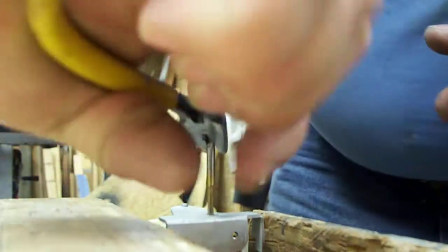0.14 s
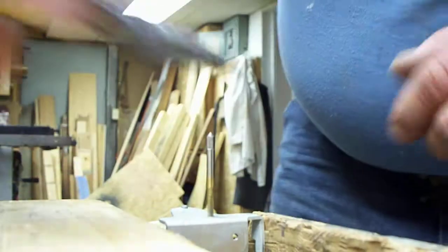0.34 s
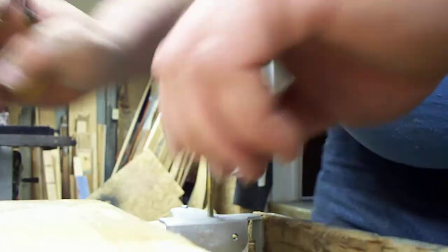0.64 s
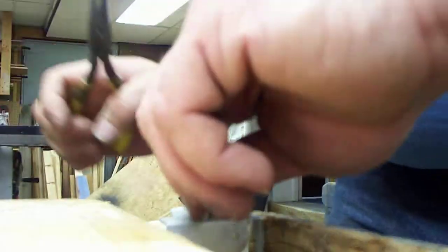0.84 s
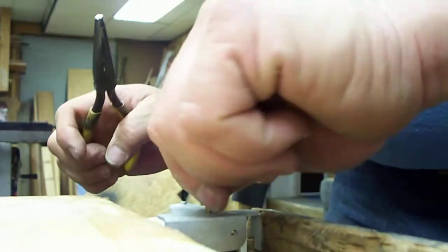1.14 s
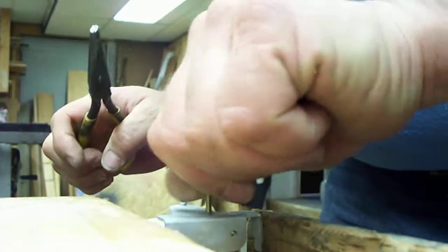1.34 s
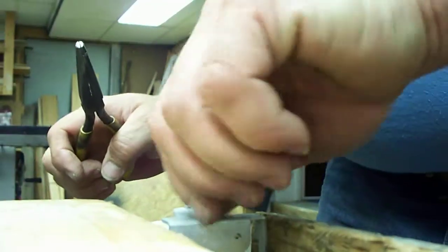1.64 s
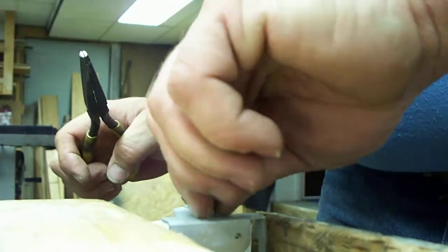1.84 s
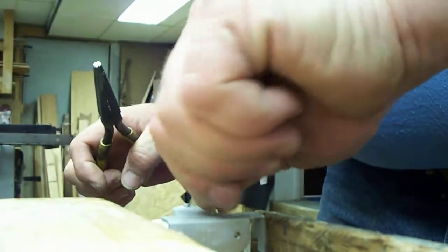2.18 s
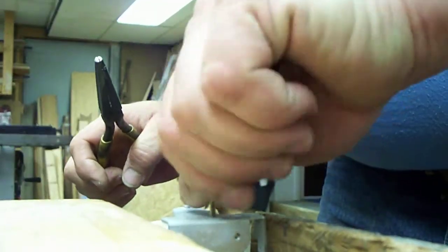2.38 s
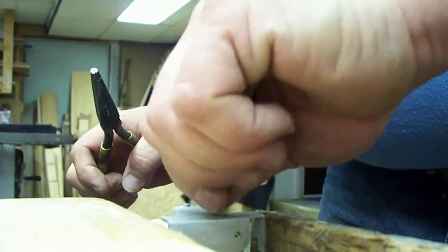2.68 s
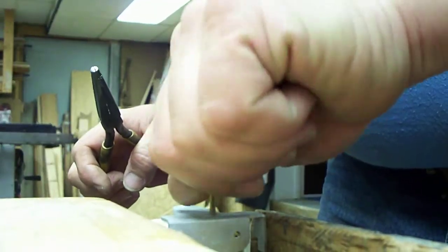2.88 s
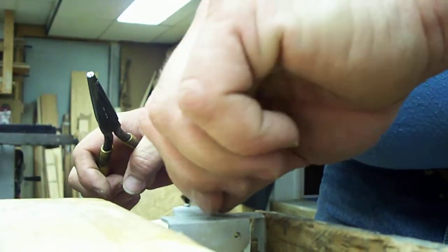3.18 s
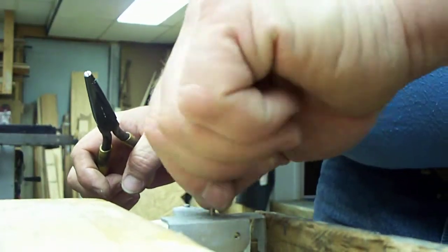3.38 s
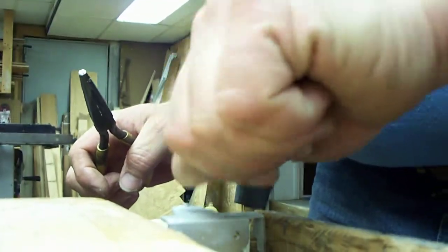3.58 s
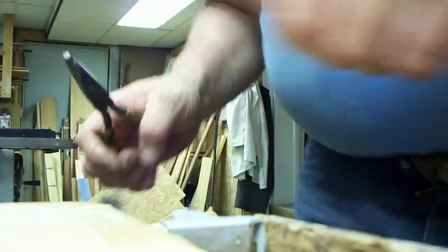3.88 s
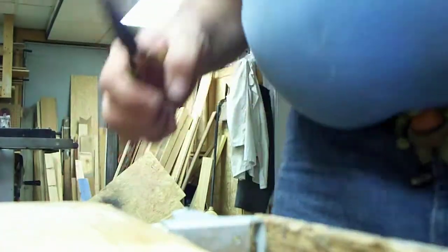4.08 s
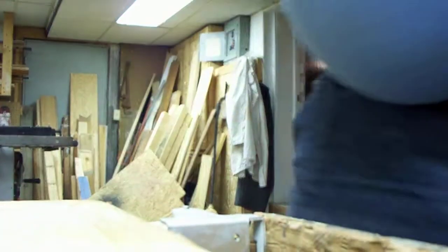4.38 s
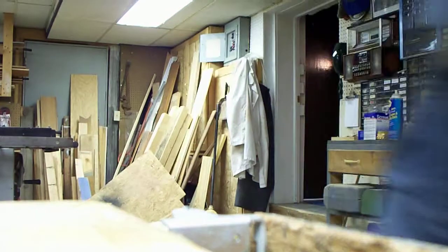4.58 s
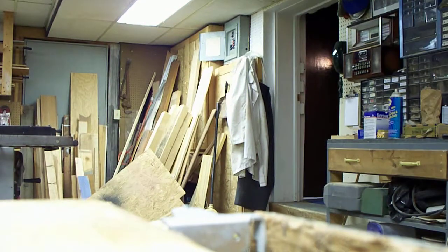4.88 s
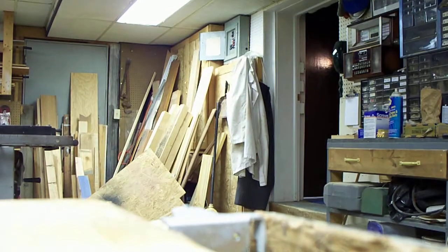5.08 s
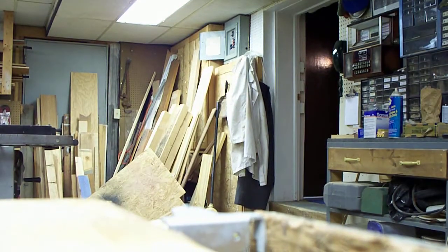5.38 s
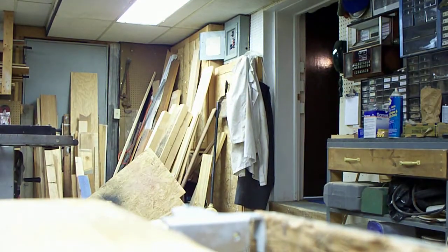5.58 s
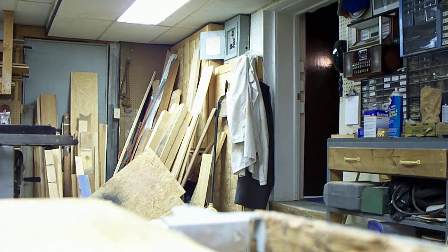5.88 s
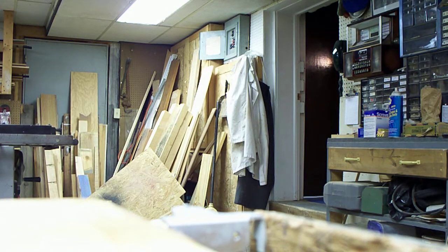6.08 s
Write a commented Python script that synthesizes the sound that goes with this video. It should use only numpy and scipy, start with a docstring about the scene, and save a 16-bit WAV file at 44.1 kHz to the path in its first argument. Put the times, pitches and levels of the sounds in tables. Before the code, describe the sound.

Small steel clacks, gritty scrapes and rustling cloth over low rush and sputtering electrical pops, ending with a loud drop of pliers on wood.

```python
"""Over a low rush, drones, a thin whine and sputtering electrical pops, a thread-cutting tap clacks and scrapes
in a steel cabinet; pliers let go of it, and fingers spin it on with faint scrapes, soft bumps and rustling cloth.
The clothes rustle more as the worker steps away, then the pliers drop on a wooden bench and the gain ducks for a
second. Struck parts are damped modes under noise bursts; scrapes and cloth are coloured grainy noise;
the sputter is a train of short pops with a dull crackle."""
import sys
import numpy as np
from scipy import signal
from scipy.fft import rfft, irfft, next_fast_len
from scipy.io import wavfile
from scipy.ndimage import minimum_filter1d

SR = 44100
rng = np.random.default_rng(int(sys.argv[2]) if len(sys.argv) > 2 else 0)


def dump(signal):
    """Clip the signal to [-1, 1] and save it as 16-bit WAV at the path in sys.argv[1]."""
    limited = np.clip(np.atleast_2d(signal).T, -1, 1)
    pcm = np.round(limited * 32767).astype(np.int16)
    wavfile.write(sys.argv[1], SR, pcm)


N = 274743
AGE = np.arange(SR // 3) / SR  # time since a contact (s)

# Colour of steel grating on steel. Each row: frequency in Hz, relative level in dB.
GRIT = [(240, -46), (400, 9), (674, 2), (1430, -1), (1700, 3.5), (2230, -7), (2790, -2), (4170, -21.5),
        (4880, -12), (5280, -16.5), (5630, -8), (6500, -4.5), (7600, -5), (9000, -31.5), (11700, -70),
        (19800, -120)]


def amp(db):
    """Decibels to gain."""
    return 10 ** (np.asarray(db) / 20)


def unit(x):
    """Scaled to rms 1."""
    return x / np.sqrt(np.mean(x ** 2) + 1e-20)


def along(points, hz):
    """(Hz, value) points read on a log frequency axis."""
    f, v = np.transpose(points)
    return np.interp(np.log(hz + 1), np.log(f + 1), v)


def filtered(x, response):
    """x times a response of frequency."""
    size = next_fast_len(len(x) + SR // 8)
    hz = np.fft.rfftfreq(size, 1 / SR)
    return irfft(rfft(x, size) * response(hz), size)[:len(x)]


def coloured(x, spectrum):
    """x with a (Hz, dB) colour, at rms 1."""
    return unit(filtered(x, lambda hz: amp(along(spectrum, hz))))


def add(track, s, sound):
    """Lays a sound into a track at s seconds."""
    start = max(round(s * SR), 0)
    track[start:start + len(sound)] += sound[:max(N - start, 0)]


def fade(t60):
    """Exponential decay after a contact, 60 dB in t60 seconds."""
    return np.exp(-np.log(1000) * AGE / t60)


def ring(modes, since=0.):
    """Damped modes at slightly fresh strengths, in step with a ring begun `since` seconds earlier."""
    x = np.zeros(len(AGE))
    for k, (hz, db, t60) in enumerate(modes):
        strength = amp(db + rng.standard_normal())
        sign = (-1) ** k  # neighbouring modes start in opposite directions
        x += sign * strength * fade(t60) * np.sin(2 * np.pi * hz * (AGE + since))
    return x / np.linalg.norm(amp([db for hz, db, t60 in modes])) / 2


def burst(spectrum, t60):
    """Many crowded modes dying together, as coloured noise."""
    return coloured(rng.standard_normal(len(AGE)), spectrum) * fade(t60)


def grains(size, spiky_db):
    """Noise made of tiny catches of uneven strength, each 32 samples long."""
    strength_db = spiky_db * np.repeat(rng.standard_normal(size // 32 + 1), 32)[:size]
    return rng.standard_normal(size) * amp(strength_db)


def background():
    """A steady low rush and hiss of coloured noise, two low drones and a thin whine."""
    # The rush and hiss. Each row: frequency in Hz, relative level in dB.
    rush = [(25, -9.5), (86, 5.5), (151, -0.5), (250, -11), (500, 1), (700, -7), (1200, -8), (1800, -10),
            (3300, -20.5), (4200, -28.5), (5000, -22), (7600, -12), (8200, -22.5), (9000, -48),
            (11000, -102)]
    # Narrow noise bands. Each row: centre in Hz, width in Hz, level in dB.
    drones = [(219.7, 25, -69.5), (416, 60, -69.5)]
    # Thin electrical whine. Each row: frequency in Hz, width in Hz, level in dB.
    whine = [(8080, 14, -79.5), (8166, 19, -87)]
    out = amp(-62.0) * coloured(rng.standard_normal(N), rush)
    for centre, width, db in drones:
        drone = filtered(rng.standard_normal(N), lambda hz: np.exp(-2 * ((hz - centre) / width) ** 2))
        out = out + amp(db) * unit(drone)
    for hz, width, db in whine:
        drift = np.sqrt(2 * np.pi * width / SR) * rng.standard_normal(N)  # a wandering phase widens the line
        out = out + amp(db) * unit(np.sin(np.cumsum(2 * np.pi * hz / SR + drift)))
    return out


def pop():
    """One electrical pop: a narrow spike, then a damped swing below zero."""
    t = AGE - .0004
    late = np.maximum(t, 0)
    spike = np.exp(-(t / .00019) ** 2)
    swing = np.sin(2 * np.pi * 280 * late) * np.exp(-late / .0013)
    return spike - 1.05 * swing


def activity(t):
    """How busy the sputter is: 1, except in its brief pauses."""
    # Pauses in the second half of some cycles. Each entry: middle of the pause in seconds.
    lulls = [.27, .47, .77, .97, 1.67, 1.87, 2.07, 2.87, 3.17, 3.57, 3.67, 3.87, 3.97, 4.07, 4.77, 4.97,
             5.27, 5.47, 5.67, 5.87, 5.97]
    half_s, depth = .026, .95  # half the length of a pause; share of the activity that it removes
    away = np.min([np.abs(t - s) for s in lulls], axis=0)
    return 1 - depth * np.exp(-(away / half_s) ** 6)


def sputter():
    """Pops of nearly equal size favour set places of every cycle, each trailing a dull crackle."""
    # Places in the cycle. Each row: time into the cycle in seconds, scatter in seconds, chance from 0 to 1.
    slots = [(.006, .0012, .95), (.0155, .0015, .6), (.025, .002, .45), (.0403, .001, .95),
             (.050, .0015, .7), (.060, .002, .35), (.074, .001, .55), (.0835, .001, .45),
             (.0937, .0008, .5)]
    # Colour of the dull crackle between pops. Each row: frequency in Hz, relative level in dB.
    murk = [(25, -14), (90, 1.5), (450, -4), (750, -5), (1500, -24.5), (3000, -29), (6000, -69)]
    cycle_s, recharge_s = .099956, .0065  # recharge: least time between pops
    pop_db, pop_scatter_db = -41, 1.3
    crackle_db, crackle_steady = -59, 0.25  # steady: crackle power added to the trails of the pops
    busy = activity(np.arange(N) / SR)
    kicks, last = np.zeros(N), -1
    for start in np.arange(0, N / SR, cycle_s):
        for place, scatter, chance in slots:
            shift, size, luck = rng.standard_normal(), rng.standard_normal(), rng.random()
            moment = min(round((start + place) * SR), N - 1)
            if luck < chance * busy[moment]:
                last = max(start + place + scatter * shift, last + recharge_s)
                add(kicks, last, amp([pop_scatter_db * size]))
    pops = signal.fftconvolve(kicks, pop())[:N]
    trail = np.abs(signal.fftconvolve(kicks, fade(t60=0.085) ** 2)[:N])
    swell = np.sqrt((trail + crackle_steady) * busy)
    crackle = swell * coloured(grains(N, spiky_db=4.0), murk)
    return amp(pop_db) * pops + amp(crackle_db) * crackle


def buzzes():
    """Near a half-second beat, three pops in quick succession make a tiny buzz."""
    # Each row: start in seconds, level in dB.
    beats = [(0.0487, -46), (0.5513, -37), (1.550, -49), (2.0388, -37), (3.040, -43.5), (3.540, -36.5),
             (4.037, -39.5), (4.536, -38.5)]
    out, shape = np.zeros(N), pop()
    for s, db in beats:
        for k in range(3):
            add(out, s + k * .00222, amp(db) * shape)
    return out


def clothes():
    """Fine fibres catch as arms and body move; each swish builds faster than it fades."""
    # One swish for each move. Each row: crest in seconds, relative level in dB, length of the fall in seconds.
    swishes = [(.66, -67, 0.11), (1.316, -64.5, 0.07), (1.483, -70, 0.065), (2.14, -68.5, 0.11),
               (2.977, -69, 0.058), (3.48, -68.5, 0.085), (3.99, -67, 0.2), (4.331, -61.5, 0.062),
               (4.569, -59.5, 0.097), (4.888, -65.5, 0.11), (6.014, -62.5, 0.025), (6.107, -62.5, 0.051)]
    # Colour of the cloth. Each row: frequency in Hz, relative level in dB.
    cloth = [(290, -33), (500, -1.5), (736, -2.5), (862, -8.5), (1280, -6), (1680, -11.5), (1980, -10.5),
             (3380, -18), (4150, -31), (5040, -20), (7150, -13.5), (8070, -22), (9000, -44.5), (11700, -78),
             (19800, -120)]
    rise = 0.61  # length of the build as a share of the fall
    t = np.arange(N) / SR
    power = np.zeros(N)
    for s, db, length in swishes:
        width = length * np.where(t < s, rise, 1)
        power += amp(db) ** 2 * np.exp(-((t - s) / width) ** 2)
    return amp(6) * np.sqrt(power) * coloured(grains(N, spiky_db=5.0), cloth)


def bumps():
    """Hands and feet softly push a low panel, which swings for a few cycles under a dry knock."""
    # Each row: start in seconds, thud level in dB, thud pitch in Hz, knock level in dB.
    pushes = [(0.116, -40.5, 280, -50), (.143, -44, 591, -51), (1.056, -51, 276, -55),
              (1.178, -40, 252, -41), (2.166, -43.5, 265, -44.5), (2.758, -44, 454, -61),
              (3.046, -40.5, 400, -55), (3.786, -43.5, 620, -71), (3.917, -35, 446, -45),
              (3.998, -50, 442, -54), (6.048, -50, 390, -44.5), (6.134, -41.5, 814, -41.5),
              (6.207, -46, 693, -41)]
    # Colour of the soft push. Each row: frequency in Hz, relative level in dB.
    push_colour = [(60, 5.5), (220, -19), (450, 7.5), (800, -2.5), (1500, -4.5), (3500, -63)]
    # Colour of the dry knock. Each row: frequency in Hz, relative level in dB.
    knock_colour = [(300, -28), (900, -9.5), (1400, 0.5), (2100, -3), (3200, -22), (4500, -42)]
    out = np.zeros(N)
    for s, thud_db, hz, knock_db in pushes:
        swing = np.sin(2 * np.pi * hz * AGE) * fade(t60=0.086) * (1 - fade(t60=0.012))  # soft attack
        thud = swing + amp(-8.5) * burst(push_colour, t60=0.079)
        knock = burst(knock_colour, t60=0.056)
        add(out, s, amp(thud_db) * thud + amp(knock_db) * knock)
    return out


def scrape(length, low_db):
    """One gritty slide swells and dies away; returns it with the time of its crest."""
    grit = coloured(grains(len(AGE), spiky_db=-3.5), GRIT)
    low_end = [(400, low_db - 18.0), (1200, low_db), (3000, low_db), (5000, 0.0035)]  # (Hz, dB)
    grit = filtered(grit, lambda hz: amp(along(low_end, hz)))
    rise = 0.055 * length  # time constant of the swell (s)
    crest = np.pi * rise
    t = AGE - crest
    swell, decay = t / rise, -np.log(1000) * t / length
    return grit * np.exp(np.minimum(swell, decay)), crest


def scrapes():
    """Clear scrapes, with faint ones at random while the tap spins; the jaws ring as they slip off the shank."""
    # Mostly steel on steel. Each row: crest in seconds, level in dB, length in seconds, low end in dB.
    clear = [(.033, -31.5, 0.0065, -8.5), (.0615, -38, 0.016, -8.5), (.0795, -30.5, 0.049, -4),
             (.110, -40, 0.042, -13), (.139, -30, 0.047, -10), (.267, -49, 0.014, -15),
             (1.06, -46.5, .025, -6), (1.181, -29.5, 0.022, -8.5), (1.767, -54.5, 0.064, 1.5),
             (1.978, -34.5, 0.036, -5.5), (2.159, -25, 0.036, -4), (2.559, -42, 0.048, -4),
             (2.650, -32.5, 0.032, -6), (2.759, -34.5, 0.038, -6), (2.773, -39.5, .035, -6.5),
             (2.837, -44.5, 0.038, -9), (3.351, -28, .04, -6.5), (3.361, -35, 0.048, -4),
             (3.404, -46, .028, -1), (3.442, -48, 0.13, 4), (4.268, -42, 0.011, -6),
             (6.048, -42.5, 0.03, 2.5)]
    # Modes of the pliers' jaws. Each row: frequency in Hz, relative level in dB, t60 in seconds.
    jaws = [(6490, -10.5, 0.094), (6900, -9, 0.087), (7800, 0.5, 0.017)]
    # Fingers spin the tap: start and end in seconds.
    start, end = (1.0, 4.0)
    faint_per_s, faint_db, faint_length_s = 4, -56.5, 0.044
    faint = []
    for k, (when, size) in enumerate(rng.random((40, 2))):
        s = start + (k + when) / faint_per_s
        if s < end:
            faint.append((s, faint_db + 6 * (size - .5), faint_length_s, 0))
    out = np.zeros(N)
    for s, db, length, low_db in list(clear) + faint:
        sound, crest = scrape(length, low_db)
        add(out, s - crest, amp(db) * sound)
    add(out, .139, amp(-24.0) * ring(jaws))
    return out


def tap():
    """Each clack rings the cabinet wall under a short bright tick and a faint chatter."""
    # The tap rocks in its hole or the cabinet is nudged.
    # Each row: start in seconds, relative level in dB, relative tick level in dB, ring tilt in dB per octave.
    clacks = [(0.0767, -29.5, -1.5, 12), (0.817, -24.5, -6, -0.5), (1.4477, -23, -7.5, 3),
              (1.95, -25, -4.5, 2.5), (2.2517, -24, -4.5, 5), (3.6391, -23.5, -4.5, 2.5),
              (3.6444, -31, -24, -4), (3.918, -35, -14, -16), (3.998, -40.5, -26, -6),
              (4.2165, -35, -17, -2), (4.5313, -35, -27, 3)]
    # Modes of the tap in the cabinet wall. Each row: frequency in Hz, relative level in dB, t60 in seconds.
    wall_modes = [(447, -19, 0.086), (785, -44, 0.014), (1308, 3, 0.025), (1604, -2, 0.028),
                  (1877, 2, 0.02), (2116, 0, 0.025), (2530, -8, 0.019), (3330, -11, 0.012)]
    # Modes of the bright tick. Each row: frequency in Hz, relative level in dB, t60 in seconds.
    tick_modes = [(5040, -17, 0.0082), (5750, -13, 0.0084), (6480, -15, 0.0039), (6820, -16.5, 0.0028)]
    lowest_hz = wall_modes[0][0]
    out = np.zeros(N)
    for s, db, tick_db, tilt_db in clacks:
        # each clack has its own ring tilt, brighter or duller
        tilted = [(hz, level + tilt_db * np.log2(hz / lowest_hz), t60) for hz, level, t60 in wall_modes]
        wall = ring(tilted)
        tick = amp(6.5) * ring(tick_modes) + amp(-9.5) * burst(GRIT, t60=0.035)
        add(out, s, amp(db) * (amp(5) * wall + amp(tick_db) * tick))
    return out


def drop():
    """Steel jaws clink and padded handles thump on the bench in a quick clatter."""
    # The pliers land and bounce. Each row: start in seconds, relative wood and steel levels in dB.
    bounces = [(4.9973, -21, -5.5), (5.0054, -8.5, -18.5), (5.0110, -7, -22), (5.0198, -4.5, -32),
               (5.0228, -24, -11), (5.0313, -19.5, -19), (5.037, -28, -14)]
    # Modes of the wooden bench. Each row: frequency in Hz, relative level in dB, t60 in seconds.
    bench = [(237, -19, .2), (334, -17, .16), (409, -19, .18), (522, -15, .13), (651, -7, .11),
             (762, -1, .085), (821, -10, .08), (1033, -6, .09), (1087, -9, .1), (1147, -9, .1),
             (1189, -6, .1), (1249, -8, .13), (1384, 2, .085), (1540, -9, .09), (1744, -11, .1),
             (1885, -15, .1), (2071, -5, .09), (2274, -15, .11), (2313, -12, .12), (2541, -18, .12),
             (2868, -14, .13)]
    # Modes of the pliers. Each row: frequency in Hz, relative level in dB, t60 in seconds.
    pliers = [(3340, -11, .1), (3520, -9, .08), (4764, -10, .09), (5760, -9, .08), (6130, -5, .08),
              (6500, -7, .09), (6967, 0, .08), (7003, -2, .08), (7084, -2, .08), (7682, -2, .08),
              (7800, -9, .1), (8290, -12, .08)]
    # Colour of the thump in the wood. Each row: frequency in Hz, relative level in dB.
    thump = [(59, -82.5), (100, -53), (203, -10.5), (555, -8.5), (755, 0), (952, -10.5), (1380, 2),
             (1490, -11), (2120, -22.5), (3430, -25.5), (4000, -30), (5200, -58.5), (8800, -120)]
    # Colour of the steel clink. Each row: frequency in Hz, relative level in dB.
    clink = [(240, -38.5), (400, -11), (1570, -5), (2150, -15), (3390, -8.5), (3710, -14.5), (4230, -35.5),
             (4570, -13), (5140, -18), (5860, -5.5), (7030, -4), (8000, -8), (9000, -36), (11700, -61.5),
             (19800, -120)]
    out = np.zeros(N)
    for s, wood_db, steel_db in bounces:
        # each bounce feeds the ring that is already there; the settling handles damp it
        wood = amp(-2) * ring(bench, since=s) * fade(t60=0.37) + amp(-11.5) * burst(thump, t60=0.1)
        steel = amp(-18.0) * ring(pliers, since=s) * fade(t60=0.44) + amp(-5.0) * burst(clink, t60=0.036)
        wood = wood * (1 - fade(t60=0.0083))  # the wood gets a softer attack than the steel
        steel = steel * (1 - fade(t60=0.0036))
        add(out, s, amp(wood_db) * wood + amp(steel_db) * steel)
    return out


def shop(x):
    """The cluttered workshop answers with a short noise tail, its decay set by frequency."""
    # Each row: frequency in Hz, t60 in seconds.
    decay = [(200, 0.21), (1000, 0.18), (3000, 0.22), (7000, 0.3)]
    hz, t, z = signal.stft(rng.standard_normal(SR // 2), SR, nperseg=256)
    dying = np.exp(-np.log(1000) * t / along(decay, hz)[:, None])
    tail = signal.istft(z * dying, SR, nperseg=256)[1]
    late_tail = np.pad(tail / np.linalg.norm(tail), (SR // 200, 0))  # starts 5 ms after the direct sound
    return signal.fftconvolve(x, late_tail)[:N]


def scene():
    """Close work on the tap, then the drop, in one small room."""
    work = tap() + scrapes() + bumps()
    no_bass = signal.butter(2, 150, "high", fs=SR, output="sos")  # the stiff bench gives no deep bass
    fall = signal.sosfilt(no_bass, drop())
    room = shop(amp(-22) * work + amp(-9.0) * fall)
    return (work + fall + room + clothes() + sputter() + buzzes() + background())[None]


def gain_control(x, trigger_db, duck_db, hold_s, glide_s):
    """A loud peak turns the gain down; it is held there, then let go."""
    hold = int(hold_s * SR) // 2
    wanted = np.where(np.abs(x) > amp(trigger_db), duck_db, 0.)
    held = minimum_filter1d(wanted, 2 * hold + 1, origin=hold, mode="constant")
    keep = np.exp(-1 / (glide_s * SR))
    gain_db = signal.lfilter([1 - keep], [1, -keep], held)
    return x * amp(gain_db)


def port(hz, notch_hz, width_hz, depth_db):
    """The microphone port swallows part of one band."""
    return amp(depth_db * np.exp(-((hz - notch_hz) / width_hz) ** 2))


def record(dry):
    """Microphone port, gain control and a steep treble cut-off."""
    top_hz = 8900
    x = filtered(dry[0], lambda hz: port(hz, notch_hz=4204, width_hz=286, depth_db=-6.5))
    x = gain_control(x, trigger_db=-13, duck_db=-6.5, hold_s=0.96, glide_s=0.011)
    return filtered(x, lambda hz: 1 / (1 + (hz / top_hz) ** 90))[None]


dry = scene()
out = record(dry)
dump(out)
```